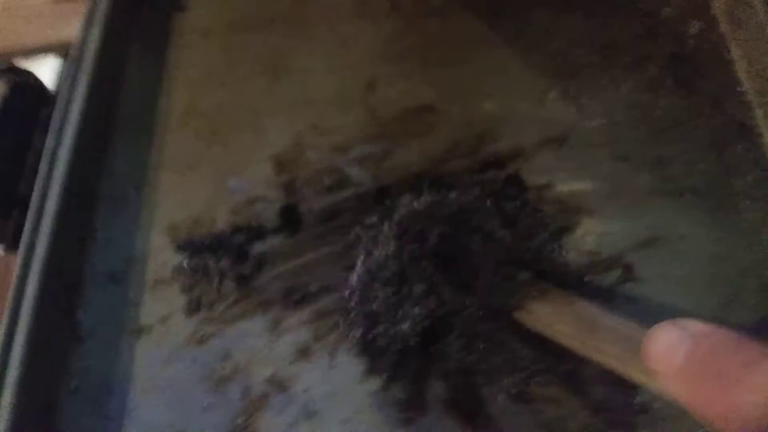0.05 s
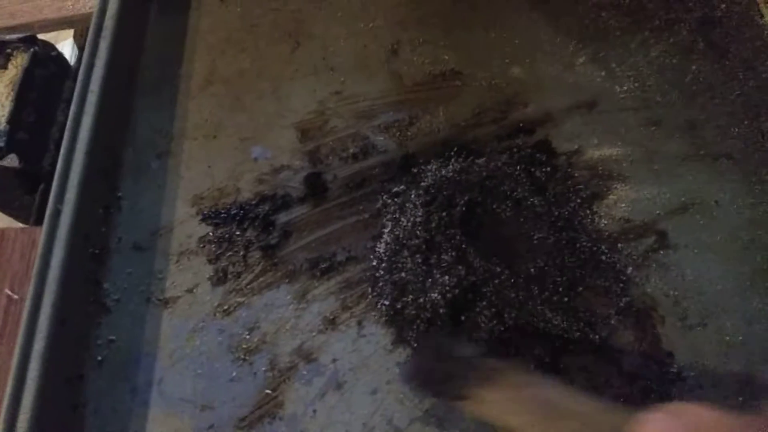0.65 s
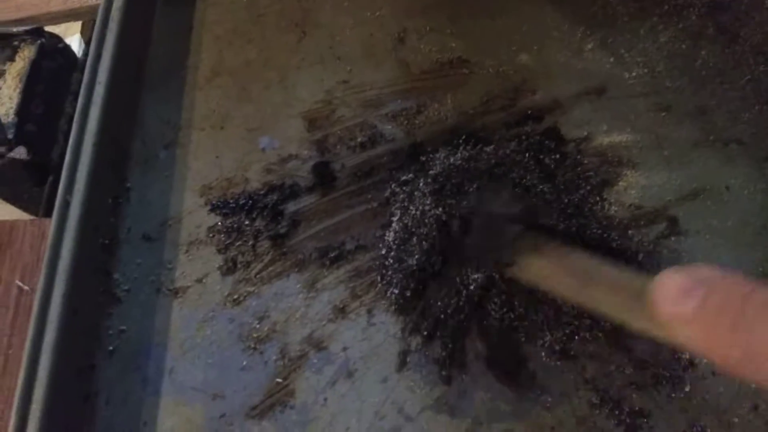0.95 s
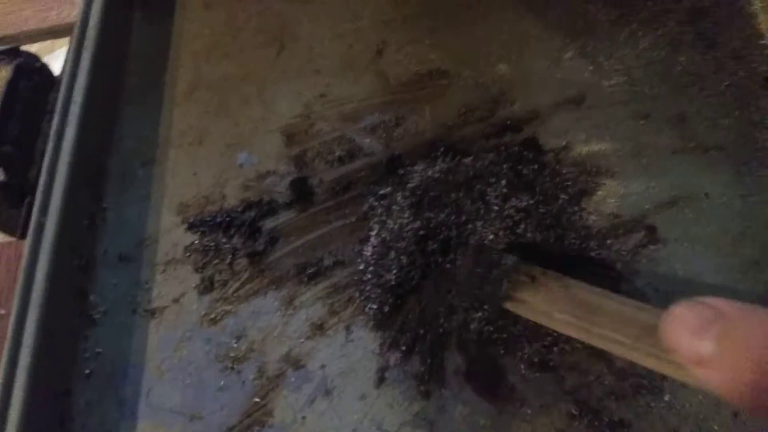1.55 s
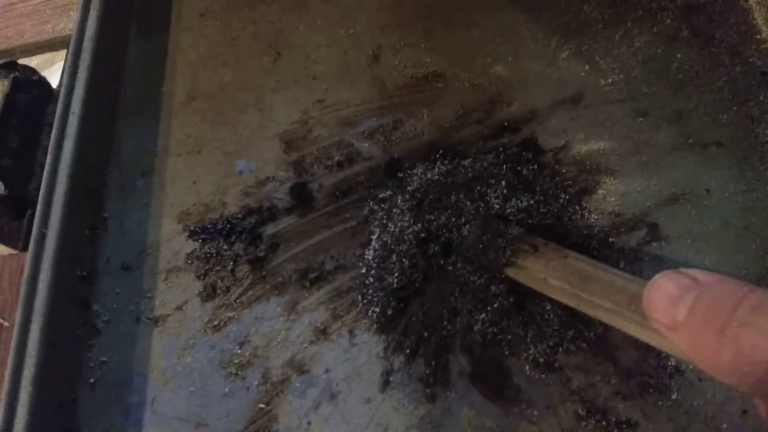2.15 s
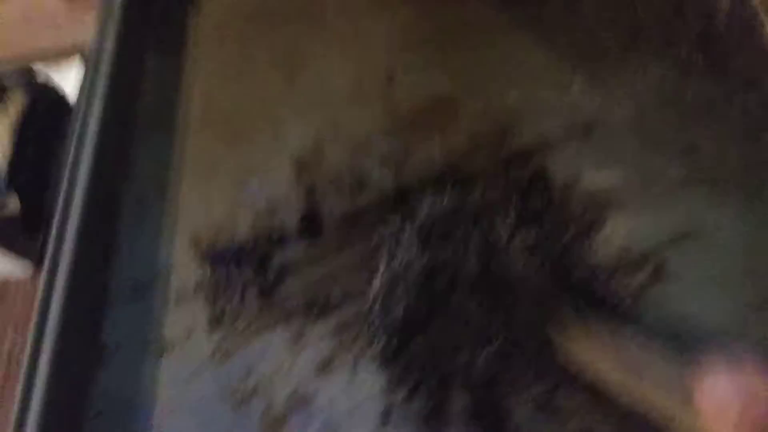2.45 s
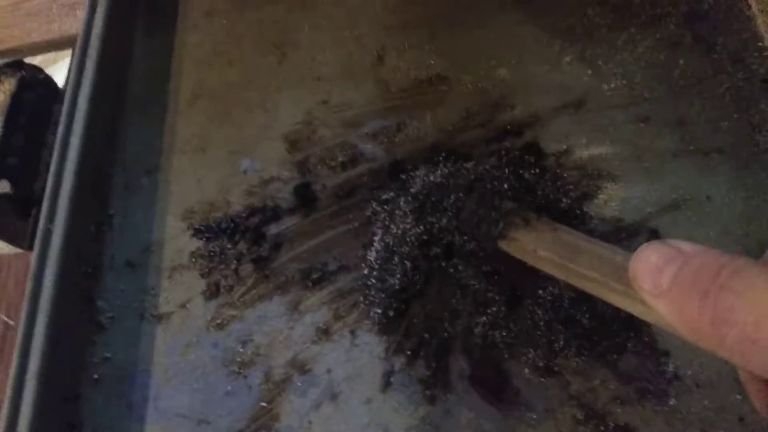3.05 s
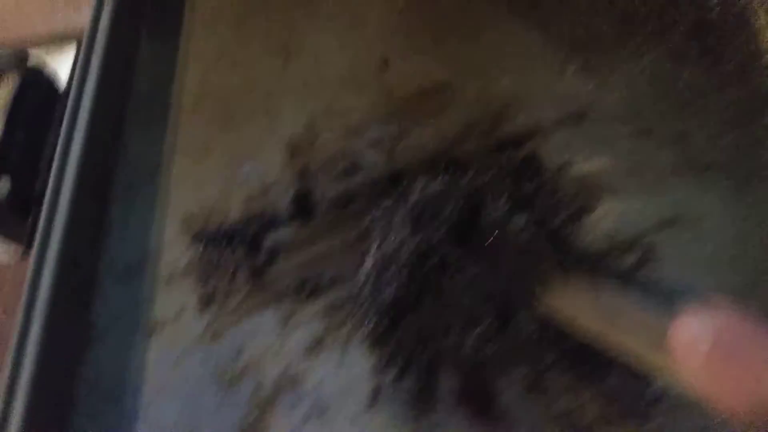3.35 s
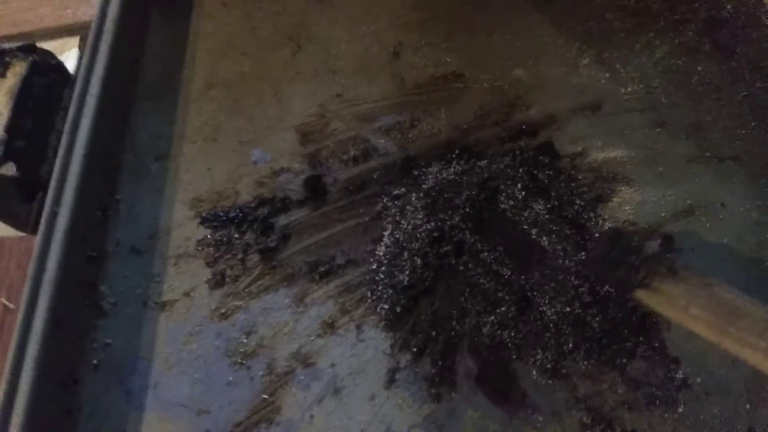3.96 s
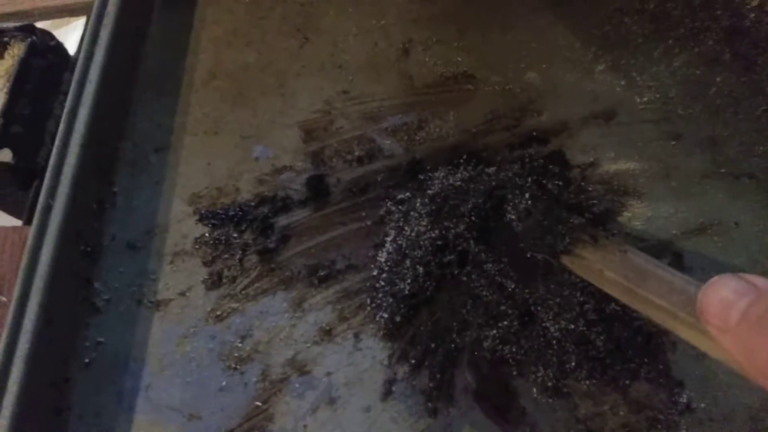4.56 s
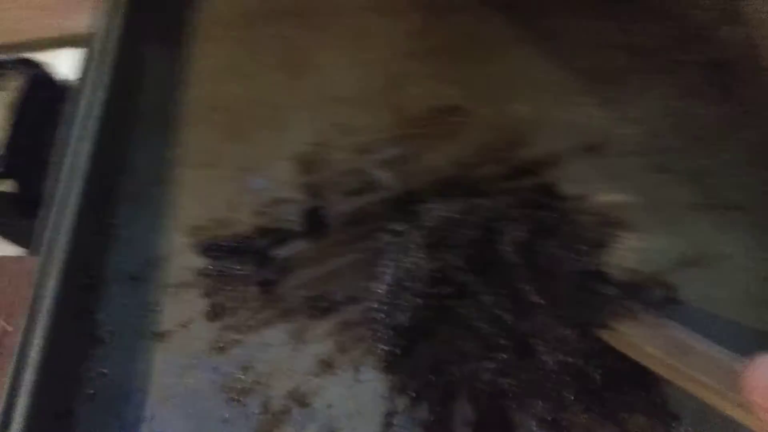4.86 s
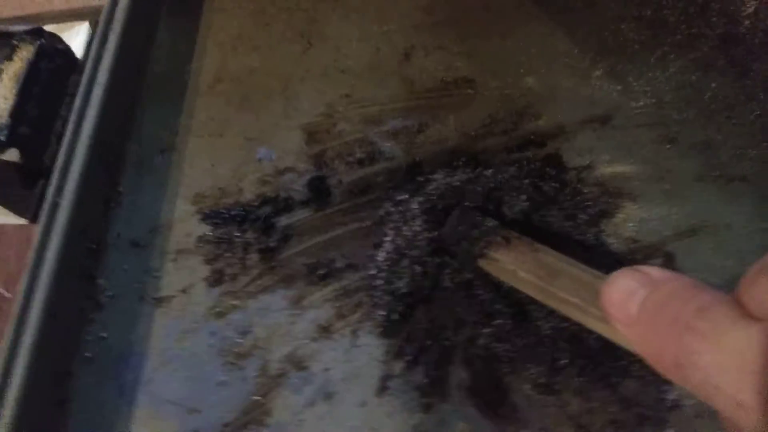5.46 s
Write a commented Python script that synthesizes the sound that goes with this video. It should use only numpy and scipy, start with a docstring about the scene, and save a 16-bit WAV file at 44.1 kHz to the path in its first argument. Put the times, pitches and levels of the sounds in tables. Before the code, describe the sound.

A wooden stick jabs and scrapes through gritty powder on a metal tray, with dry rasps, knocks and sharp little cracks.

```python
"""A wooden stick works through gritty powder on a metal tray on the floor of a small room.
It starts with a scrape and a crack: slipping grains rasp and shake the stick and tray, and coarse
ones shatter. Jabs and short scrapes follow, some knocking through to the metal, hardest at 1.5 s.
Near 2.3 s the tip squeaks on bare metal, and at 3.4 s comes the loudest crack. After a lull, more
jabs and scrapes end in a last crack at 5.7 s. The room answers each sound with a short echo."""
import sys
import numpy as np
from scipy import signal
from scipy.fft import rfft, irfft, next_fast_len
from scipy.io import wavfile
from scipy.ndimage import map_coordinates

SR = 44100
rng = np.random.default_rng(int(sys.argv[2]) if len(sys.argv) > 2 else 0)


def master(y):
    """Save y as 16-bit WAV."""
    cut = np.clip(np.atleast_2d(y).T, -1, 1)
    pcm = np.round(cut * 32767)  # scale
    wavfile.write(sys.argv[1], SR, pcm.astype(np.int16))


N = 252252
TIME = np.arange(N) / SR


def amp(db):
    """Turn decibels into a number to multiply by."""
    return 10 ** (np.asarray(db) / 20)


def unit(x):
    """Scale x to an average power of 1."""
    return x / np.sqrt(np.mean(x ** 2) + 1e-20)


def along(points, hz):
    """Read between (Hz, value) points on a log frequency axis."""
    known_hz, values = np.transpose(points)
    return np.interp(np.log(hz + 1), np.log(known_hz + 1), values)


def wobble(rate):
    """A smooth curve through `rate` random values a second."""
    return map_coordinates(rng.standard_normal(int(N * rate / SR) + 4), [TIME * rate])


def filtered(x, response):
    """Scale each frequency in x by response(hz)."""
    size = next_fast_len(N + SR // 2)
    return irfft(rfft(x, size) * response(np.fft.rfftfreq(size, 1 / SR)), size)[:N]


def convolved(x, ring):
    """Let every sample of x set off a copy of `ring`, scaled to an energy of 1."""
    return signal.fftconvolve(x, ring / np.linalg.norm(ring))[:N]


def coloured(x, spectrum, size=2048):
    """Give x this tone colour, with no ringing ahead of a click."""
    cepstrum = irfft(np.log(amp(along(spectrum, np.fft.rfftfreq(size, 1 / SR)))))
    cepstrum[1:size // 2] *= 2
    cepstrum[size // 2 + 1:] = 0
    return convolved(x, irfft(np.exp(rfft(cepstrum))))


def resonate(force, modes):
    """A force rings an object's modes, its natural notes; wider ones die sooner."""
    t = np.arange(SR // 4) / SR
    ring = sum((-1) ** k * amp(db) * width * np.exp(-np.pi * width * t) * np.cos(2 * np.pi * hz * t)
               for k, (hz, width, db) in enumerate(modes))
    return convolved(force, ring)


def grit(per_second, spread_db, clump_db, clump_hz):
    """Tiny slips of unequal grains, bunched as the tip catches and lets go."""
    slips = (rng.random(N) < per_second / SR) * rng.standard_normal(N)
    return unit(slips * amp(spread_db * rng.standard_normal(N) + clump_db * wobble(clump_hz)))


# The tone of the quiet room. Each row: frequency in Hz, relative level in dB.
HUSH_SPECTRUM = [(25, -32.5), (60, -38.5), (100, -25), (160, -11.5), (230, -7.5), (450, -6), (750, -9.5),
                 (1500, -13), (4000, -19.5), (5800, -25.5), (8000, -28), (12000, -24), (16000, -26)]
def room_hush(level_db):
    """The steady, soft noise of the room."""
    return amp(level_db) * unit(filtered(rng.standard_normal(N), lambda hz: amp(along(HUSH_SPECTRUM, hz))))


# How long the echo lasts. Each row: frequency in Hz, seconds to fade by 60 dB (called t60).
ECHO_FADE = [(150, 0.47), (500, 0.44), (2000, 0.31), (5000, 0.32), (12000, 0.19)]
# How strong the echo is. Each row: frequency in Hz, gain in dB.
ECHO_GAIN = [(150, -11), (500, -10.5), (1200, -15.5), (4000, -25.5), (12000, -21.5)]
def room_echo(sound):
    """The walls answer: low notes come back strongest and last longest."""
    hz, t, noise = signal.stft(rng.standard_normal(SR), SR, nperseg=256)
    t60 = along(ECHO_FADE, hz)[:, None]
    tail = signal.istft(noise * amp(-60 * t / t60) / np.sqrt(t60), SR, nperseg=256)[1]
    tail *= 1 - np.exp(-np.arange(len(tail)) / SR / 0.012)  # the echo takes a moment to build
    return filtered(convolved(sound, tail), lambda f: amp(along(ECHO_GAIN, f)))


def near_echoes(sound, level_db, t60):
    """The tray's rim and the floor scatter a quick flurry of reflections."""
    t = np.arange(SR // 8) / SR
    flurry = rng.standard_normal(len(t)) * amp(-60 * t / t60) * (t > .0015)
    return amp(level_db) * convolved(sound, flurry)


# The stick shifts lightly. Each row: start and end in seconds, relative level in dB.
STIR_SPANS = [(0.121, .27, -73), (2.202, 2.437, -57), (2.546, 2.737, -62.5), (3.15, 3.343, -58),
              (3.548, 3.848, -66.5), (5.09, 5.357, -71), (5.414, 5.647, -57.5)]
def trickle(force, level_db, settle_s, stir_db):
    """Loose grains roll on after each push, and stir faintly under the resting stick."""
    keep = np.exp(-1 / (settle_s * SR))
    loosened = np.sqrt(signal.lfilter([1 - keep], [1, -keep], force ** 2))
    stirred = np.zeros(N)
    for start, end, db in STIR_SPANS:
        stirred += amp(db + stir_db) * np.sqrt(np.interp(TIME, [start, (start + end) / 2, end], [0, 1, 0]))
    slips = grit(per_second=3300, spread_db=2.5, clump_db=5, clump_hz=120)
    return (amp(level_db) * loosened + stirred) * slips


# The short squeals of one squeak. Each row: start and length in seconds, level in dB.
SQUEAK_BURSTS = [(2.252, 0.013, -34.5), (2.284, 0.018, -40.5), (2.308, 0.01, -36), (2.362, .006, -50.5)]
def squeak(pitch_hz, waver_hz, flutter_db, chatter_hz, chatter_db, ring_db):
    """The tip sticks and slips on bare metal: a thin whistle, then a lingering ring and rough chatter."""
    def loudness(fall_db_per_s, rise_db_per_s=2401):
        bursts = []
        for start, length, db in SQUEAK_BURSTS:
            before_db = rise_db_per_s * np.maximum(start - TIME, 0)
            after_db = fall_db_per_s * np.maximum(TIME - start - length, 0)
            bursts.append(amp(db - np.minimum(before_db + after_db, 150)))
        return np.max(bursts, axis=0)

    pitch = pitch_hz + waver_hz * wobble(400)
    whistle = np.sqrt(2) * np.sin(2 * np.pi * np.cumsum(pitch) / SR) * amp(flutter_db * wobble(170))
    chatter = unit(filtered(rng.standard_normal(N), lambda hz: np.exp(-((hz - chatter_hz) / 190) ** 2)))
    lingering = amp(ring_db) * whistle + amp(chatter_db) * chatter
    return loudness(fall_db_per_s=1000) * whistle + loudness(fall_db_per_s=180) * lingering


# The tray's natural notes. Each row: pitch in Hz, width in Hz, relative level in dB.
TRAY_MODES = [(184, 78, -9.5), (237, 59, -6), (308, 30, 1), (375, 92, -3), (458.8, 52, 3), (570.6, 79, 0.5),
              (678, 110, -4)]
def tray_thrum(force):
    """The tray rings low; the pressing tip flexes it, so its pitches wander a few percent."""
    flex_samples = .002 * SR * wobble(9)
    return np.interp(np.arange(N) + flex_samples, np.arange(N), resonate(force, TRAY_MODES))


# The stick's natural notes. Each row: pitch in Hz, width in Hz, relative level in dB.
STICK_MODES = [(798, 250, -7), (949, 70, 1.5), (1095, 96, -3.5), (1403, 300, -7), (1768.5, 93, 3.5),
               (1823, 165, 2.5), (2320, 89, -2), (2435, 72, -1), (2920, 120, -6.5), (3017, 90, -9)]
def stick_ring(force):
    """Grains shake the wooden stick, which rings higher than the tray."""
    return resonate(force, STICK_MODES)


# The tip hits metal. Each row: time in seconds, relative level in dB, favoured pitch in Hz.
KNOCK_HITS = [(0.846, -26, 1070), (1.277, -34, 2290), (1.305, -33.5, 2280), (1.486, -16, 2044),
              (1.507, -26, 2300), (1.795, -33.5, 460), (2.222, -37, 1800), (2.53, -39.5, 298),
              (4.795, -21.5, 1780), (4.797, -31.5, 450), (4.8, -34.5, 272), (5.541, -38.5, 575),
              (5.547, -44, 318)]
def knocks(level_db, attack_s, blur, reach_octaves, ring_stretch):
    """Each spot hit favours some notes of tray and stick; they ring longer than under a dragging tip."""
    t, sound = np.arange(SR // 4) / SR, np.zeros(N + SR)
    hz, width, _ = np.transpose(TRAY_MODES + STICK_MODES)[:, :, None]
    fade = np.exp(-np.pi * width * t / ring_stretch) * (1 - np.exp(-t / attack_s))
    for start, db, favoured_hz in KNOCK_HITS:
        weight = np.exp(-(np.log2(hz / favoured_hz) / reach_octaves) ** 2)
        rattle = np.cumsum(rng.normal(0, blur, fade.shape), axis=1) * hz / 1000  # grit blurs the pitch
        phase = 2 * np.pi * hz * t + rattle + rng.uniform(0, 2 * np.pi, hz.shape)
        ring = np.sum(weight * fade * np.sin(phase), axis=0)
        sound[round(start * SR):][:len(t)] += amp(db + level_db) * ring / np.linalg.norm(weight)
    return sound[:N]


# How much bass reaches the air. Each row: frequency in Hz, gain in dB.
BASS_LOSS = [(25, -36), (60, -26.5), (100, -11.5), (170, 0)]
def radiate(vibration):
    """Vibration becomes sound; the tray gives off little deep bass."""
    return filtered(vibration, lambda hz: amp(along(BASS_LOSS, hz)))


# Coarse grains shatter. Each row: time in seconds, relative level in dB.
CRACK_HITS = [(0.0034, -8.5), (0.01, -3.5), (0.9865, -18), (1.484, -10.5), (2.3734, -41), (2.5101, -15),
              (3.3867, 3.5), (3.3983, -9), (3.4018, -3), (4.7624, -7.5), (4.794, -1), (4.8147, -5.5),
              (5.695, -2)]
# The tone of a crack. Each row: frequency in Hz, relative level in dB.
CRACK_SPECTRUM = [(40, -22), (150, -16.5), (300, -10), (1000, -6.5), (2800, -9), (4200, 4.5), (6700, -0.5),
                  (8000, -6.5), (11000, -7), (16000, -17.5)]
def cracks(level_db, t60):
    """A coarse grain bursts in a short, bright crack."""
    t, bursts = np.arange(SR // 50) / SR, np.zeros(N + SR)
    for start, db in CRACK_HITS:
        burst = amp(db + level_db - 60 * t / t60) * rng.choice([-1, 1], len(t))
        bursts[round((start + .001) * SR):][:len(t)] += burst
    return coloured(bursts[:N], CRACK_SPECTRUM)


# The tone of slipping grains. Each row: frequency in Hz, relative level in dB.
RASP_SPECTRUM = [(300, -35.5), (1500, -4.5), (2500, -8), (3000, -3), (3350, -0.5), (4300, 0.5), (5100, -1),
                 (5500, -5.5), (6700, -4), (7800, -14), (10500, -16.5), (13000, -23.5), (16000, -30)]
def rasp(force):
    """The slipping grains sound straight into the air as a dry, bright rasp."""
    return coloured(force, RASP_SPECTRUM)


# The tip stabs. Each row: time in seconds, relative level in dB, extra dB for stick and for tray.
JAB_HITS = [(0.2683, -41, -9, -6.5), (0.294, -22.5, -16, -25.5), (0.3049, -28, -10, -23.5),
            (0.8449, -19.5, -15, 0.5), (1.2758, -19.5, -11.5, -11), (1.4844, -6.5, -18, -22),
            (1.5069, -12, -20, -27), (1.7498, -24.5, -6.5, -14), (1.7927, -19.5, -13, -14),
            (1.933, -49.5, -22, -21), (2.2216, -14.5, -11.5, -19.5), (2.4607, -33.5, -20, -12.5),
            (2.65, -44, -22, -3.5), (2.7067, -36, -14, -8.5), (2.73, -30, -20.5, -26),
            (2.805, -22, -19, -30), (3.1079, -16, -24.5, -22.5), (3.1434, -25.5, -17.5, -18),
            (3.265, -32.5, -11, -8.5), (3.3372, -28, -16.5, -12), (3.6057, -40, -13, -15),
            (3.6698, -34.5, -17, -12), (3.6822, -31.5, -14, -22), (4.3085, -37, -12.5, -15),
            (4.348, -24.5, -15.5, -19), (4.591, -27, -19.5, -18), (4.6118, -30, -10, -14),
            (4.619, -27.5, -19, -20), (4.8528, -17, -22, -31), (4.9935, -32, -19, -26),
            (5.0627, -38.5, -20, -17.5), (5.103, -48.5, -19, -8), (5.3558, -21.5, -19, -30),
            (5.461, -34.5, -7.5, -7.5), (5.5392, -18, -11.5, -21.5)]
def jabs(grain_db, stick_db, tray_db, bite_db, t60):
    """Each stab packs the powder in a sudden crunch; gives the forces on grains, stick and tray."""
    t, forces = np.arange(SR // 3) / SR, np.zeros((3, N + SR))
    onset = np.interp(t, [.0007, .0018], [0, 1])  # starts just after the listed time, rises in about 1 ms
    bite = 1 + amp(bite_db - 60 * t / 0.028)  # the first layer of grains breaks hardest
    crunch = amp(-60 * t / t60) * onset * bite
    for start, db, stick, tray in JAB_HITS:
        first = round(start * SR)
        shares = amp([[grain_db], [stick + stick_db], [tray + tray_db]])
        forces[:, first:first + len(t)] += amp(db) * shares * crunch
    return forces[:, :N] * grit(per_second=21000, spread_db=2.5, clump_db=1, clump_hz=420)


# The tip drags. Each row: times of touch, full grip and letting go in seconds, relative levels
# at grip and at letting go in dB, extra dB for stick and for tray.
SCRAPE_STROKES = [(0, 0.002, 0.064, -25, -28, -10.5, -8.5), (0.845, 0.848, 0.868, -30, -38, 5.5, -2),
                  (0.849, 0.893, 0.95, -28, -31.5, -8.5, -14),
                  (0.927, 0.978, 1.0324, -25.5, -33.5, -8.5, -15.5),
                  (1.275, 1.301, 1.3315, -27.5, -30, -3.5, -9.5),
                  (1.486, 1.507, 1.536, -23, -28.5, -7, -13), (1.747, 1.756, 1.775, -33, -38, -2.5, -7),
                  (1.781, 1.807, 1.816, -30.5, -38, -2, -1.5),
                  (2.116, 2.128, 2.212, -42.5, -45.5, -7.5, -11),
                  (2.436, 2.47, 2.53, -30.5, -26.5, -8.5, -9.5), (2.777, 2.796, 2.816, -32, -36, -7.5, -13),
                  (3.084, 3.112, 3.136, -30, -34, -9, -11), (3.321, 3.341, 3.379, -35.5, -25.5, -10, -11.5),
                  (3.376, 3.388, 3.4634, -21, -29.5, -11.5, -9.5),
                  (4.467, 4.476, 4.537, -36, -44.5, -8, -8.5), (4.681, 4.724, 4.79, -33, -31, -9.5, -10),
                  (4.79, 4.796, 4.82, -29, -29, -8.5, -9), (4.848, 4.854, 4.87, -31, -36, -8.5, -12.5),
                  (4.954, 4.974, 4.994, -43.5, -40, -9.5, -14.5),
                  (5.342, 5.357, 5.346, -27.5, -28, -5.5, -11), (5.37, 5.385, 5.402, -45, -43, -17, -15),
                  (5.636, 5.667, 5.72, -29.5, -26, -9.5, -13)]
def scrapes(grain_db, stick_db, tray_db, rise_db):
    """The tip takes hold, drags ever deeper and lets go; gives the forces on grains, stick and tray."""
    fades_db_per_s = (740, 600, 450)  # grains fall quiet first, then the stick, last the tray
    power = np.zeros((3, N))
    for touch, grip, let_go, first_db, last_db, stick, tray in SCRAPE_STROKES:
        active = (TIME >= touch) & (TIME < let_go + .5)
        t = TIME[active]
        progress = np.interp(t, [grip, let_go], [0, 1])
        slack = np.interp(t, [touch, grip], [1, 0])
        level_db = first_db + (last_db - first_db) * progress - rise_db * slack
        depth = progress - .5  # nearer the metal, stick and tray shake harder
        shares_db = (grain_db, stick + stick_db + 2.5 * depth, tray + tray_db + 2 * depth)
        for row, share, fade in zip(power, shares_db, fades_db_per_s):
            row[active] += amp(level_db + share - fade * np.maximum(t - let_go, 0)) ** 2
    return np.sqrt(power) * grit(per_second=18000, spread_db=2, clump_db=1.58, clump_hz=260)


def scene():
    """The same slipping grains rasp in the air and shake the stick and the tray."""
    forces = scrapes(grain_db=-2, stick_db=2, tray_db=-1.5, rise_db=25)
    forces += jabs(grain_db=-11, stick_db=-1, tray_db=-5, bite_db=-3.5, t60=0.069)
    on_grains, on_stick, on_tray = forces
    on_grains += trickle(on_grains, level_db=-35, settle_s=0.046, stir_db=-0.5)
    vibration = stick_ring(on_stick) + tray_thrum(on_tray)
    vibration += knocks(level_db=3.5, attack_s=0.00045, blur=.035, reach_octaves=.27, ring_stretch=2.15)
    direct = rasp(on_grains) + radiate(vibration) + cracks(level_db=-5, t60=.007)
    direct += squeak(pitch_hz=3525, waver_hz=21.4, flutter_db=4,
                     chatter_hz=3340, chatter_db=-12.5, ring_db=-16)
    close = direct + near_echoes(direct, level_db=-9, t60=0.064)
    return (close + room_echo(close) + room_hush(level_db=-65))[None]


def record(dry):
    """The sharpest cracks are rounded off and the very highest treble is cut."""
    ceiling, top_hz = .78, 16100
    rounded = dry[0] / (1 + (dry[0] / ceiling) ** 4) ** .25
    return filtered(rounded, lambda hz: hz < top_hz)[None]


dry = scene()
out = record(dry)
master(out)
```